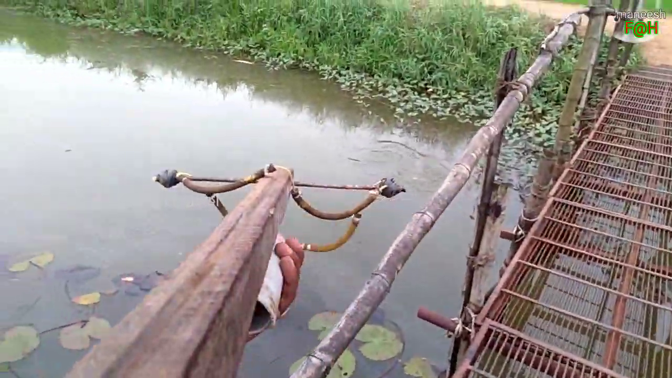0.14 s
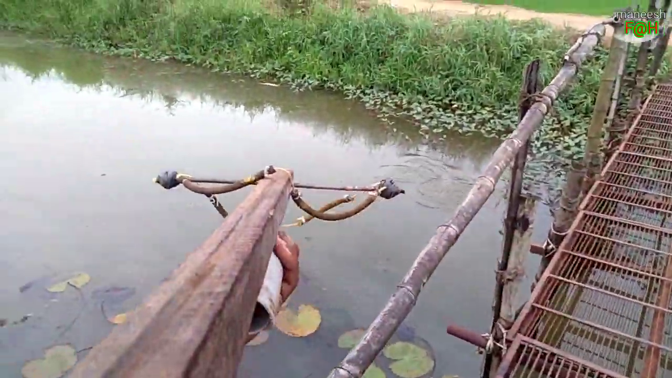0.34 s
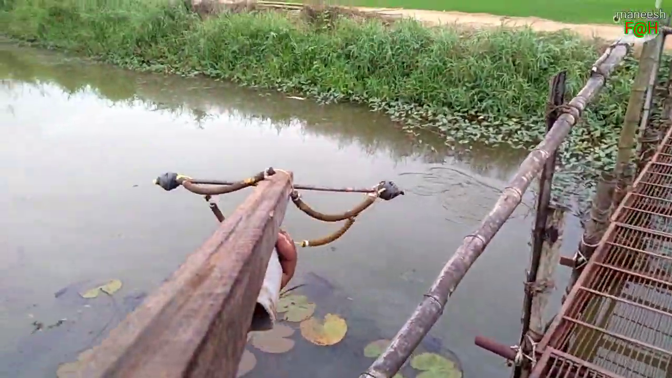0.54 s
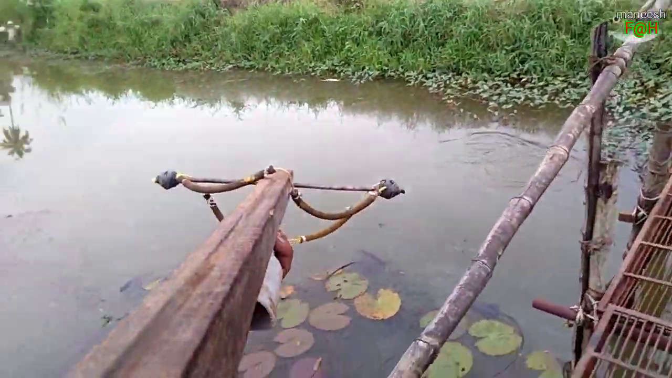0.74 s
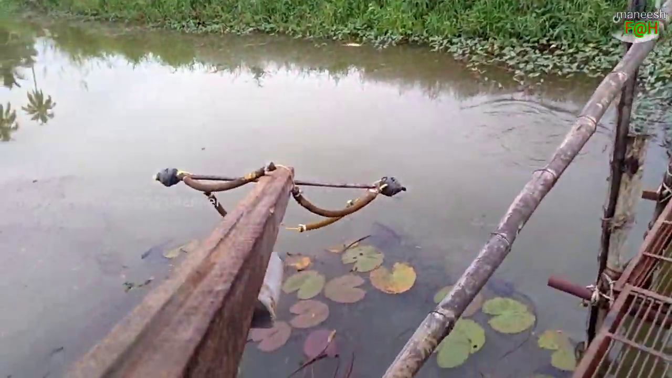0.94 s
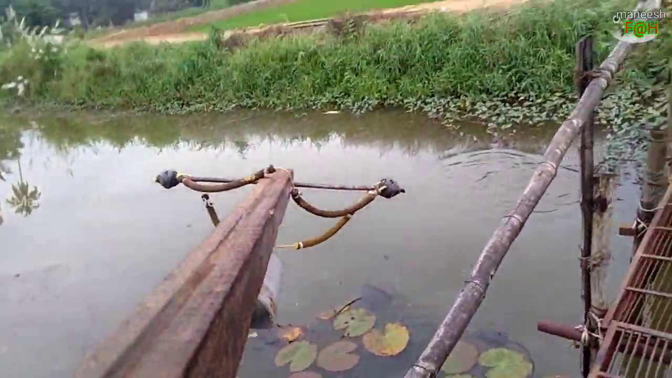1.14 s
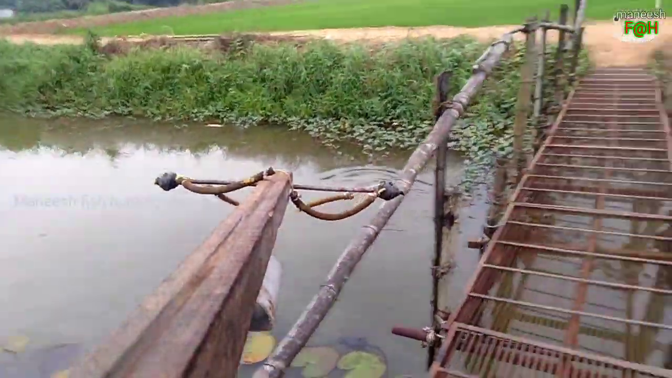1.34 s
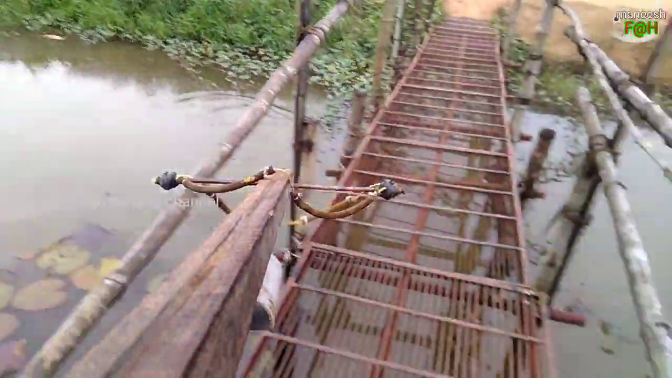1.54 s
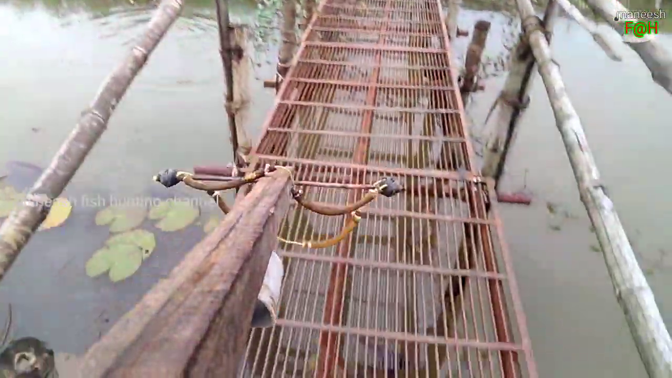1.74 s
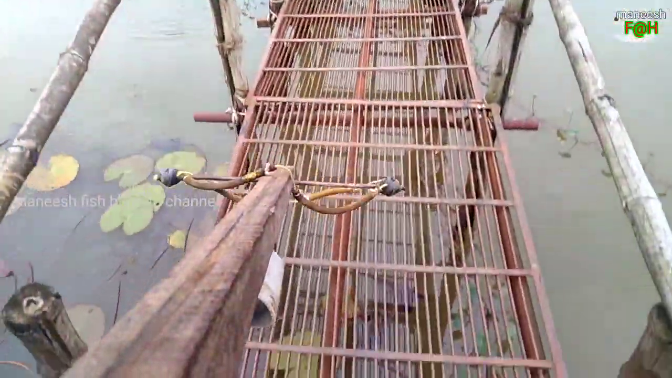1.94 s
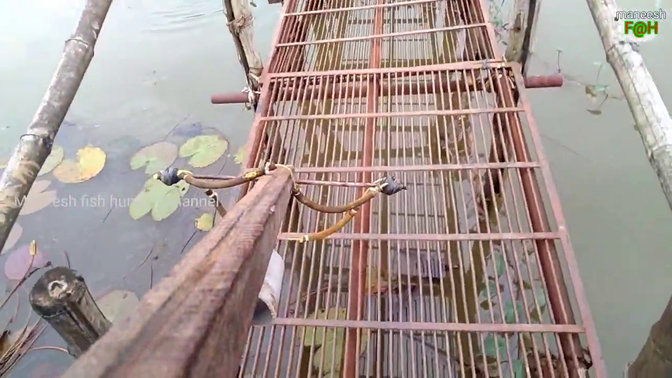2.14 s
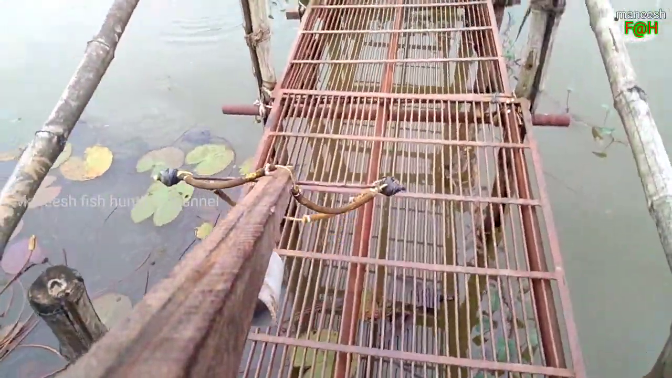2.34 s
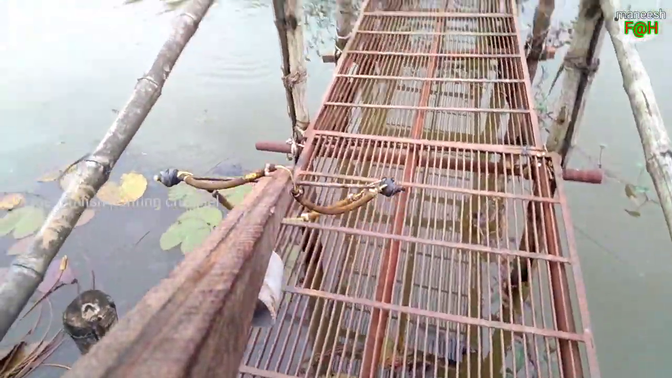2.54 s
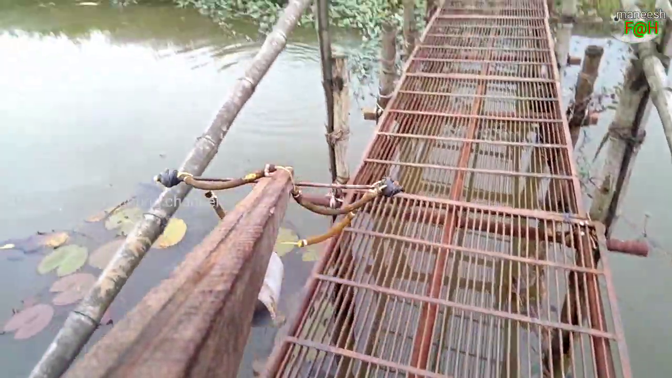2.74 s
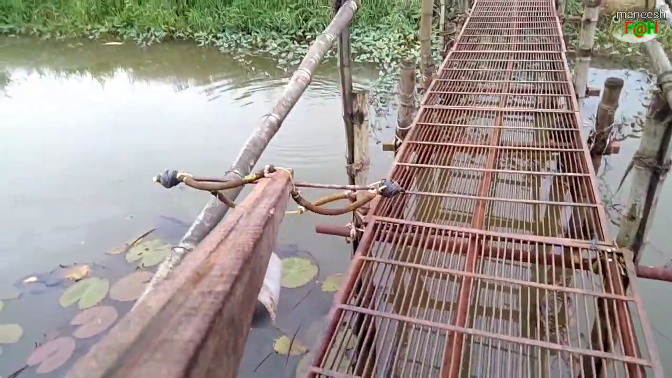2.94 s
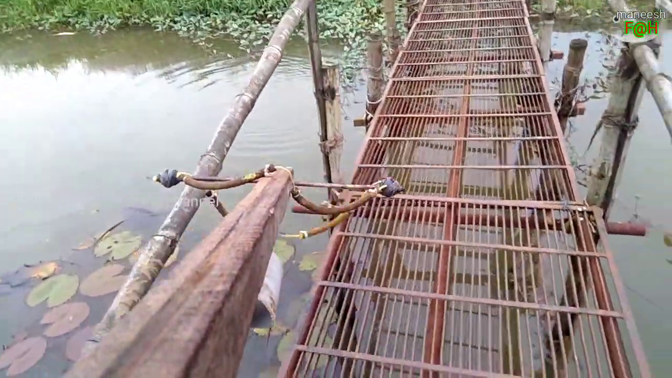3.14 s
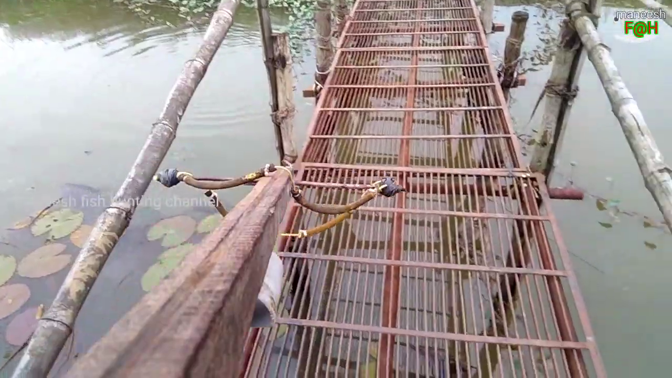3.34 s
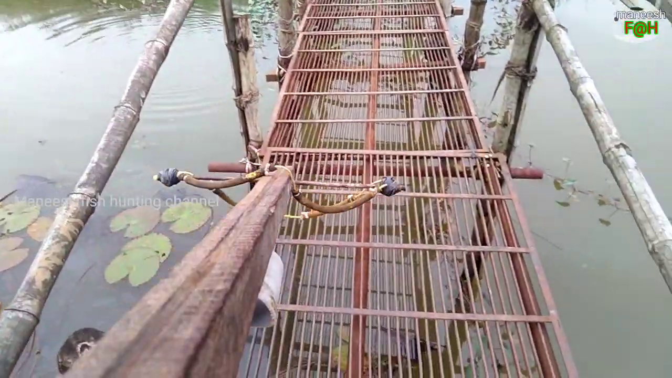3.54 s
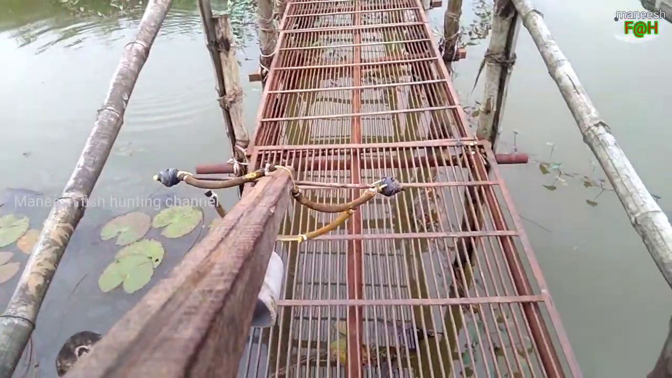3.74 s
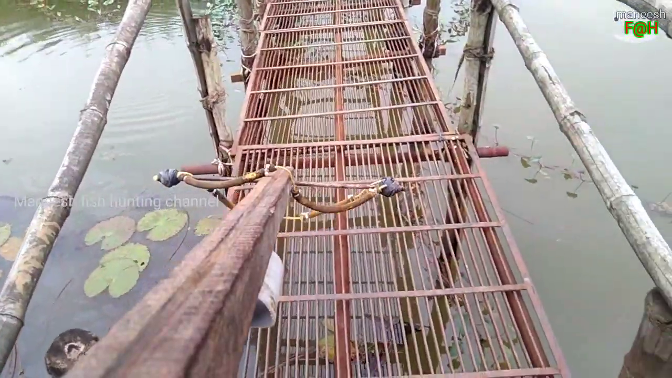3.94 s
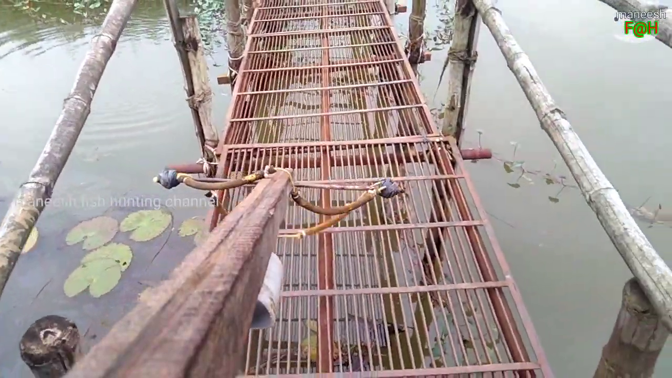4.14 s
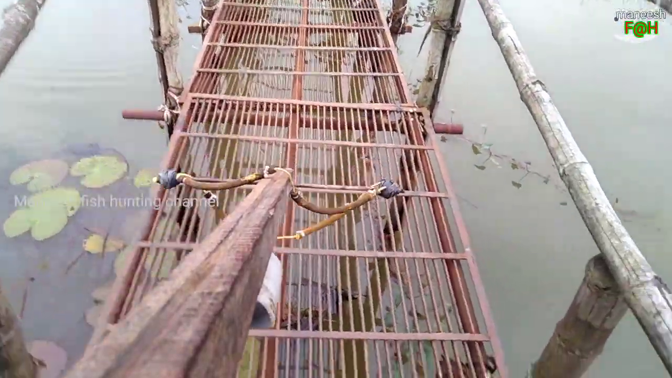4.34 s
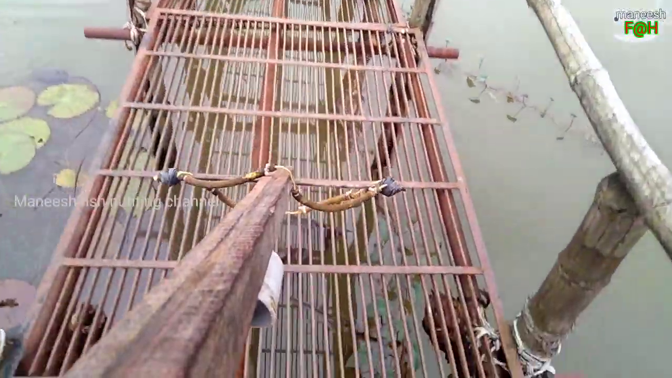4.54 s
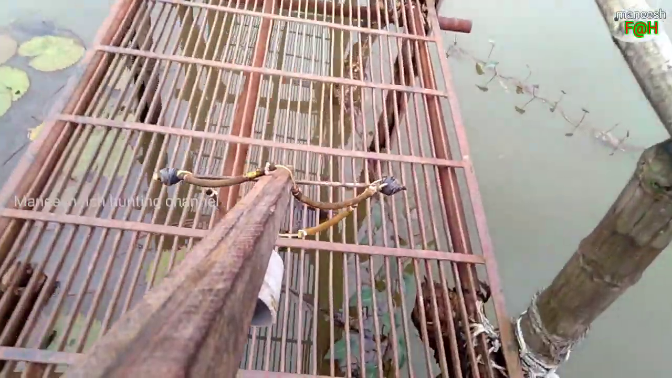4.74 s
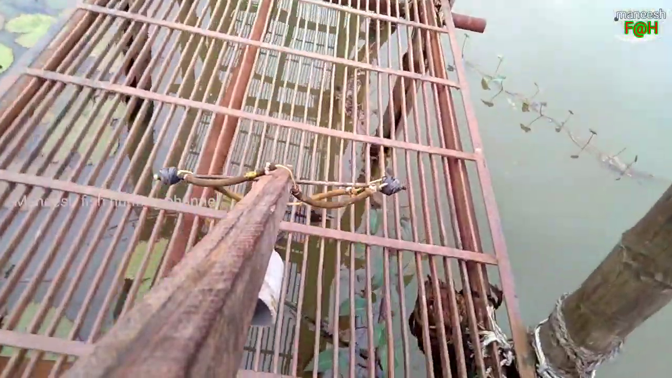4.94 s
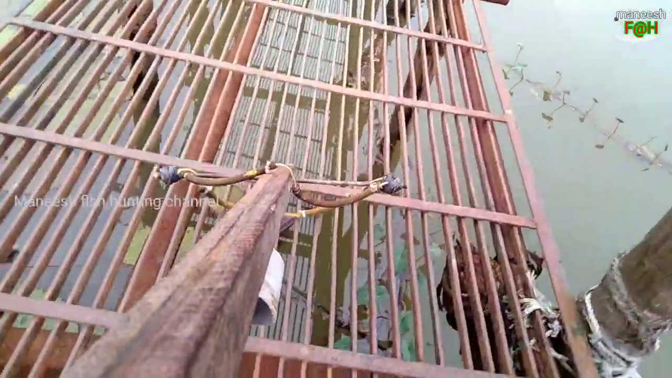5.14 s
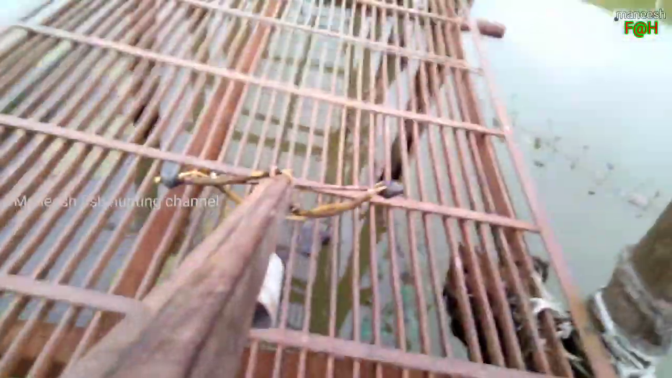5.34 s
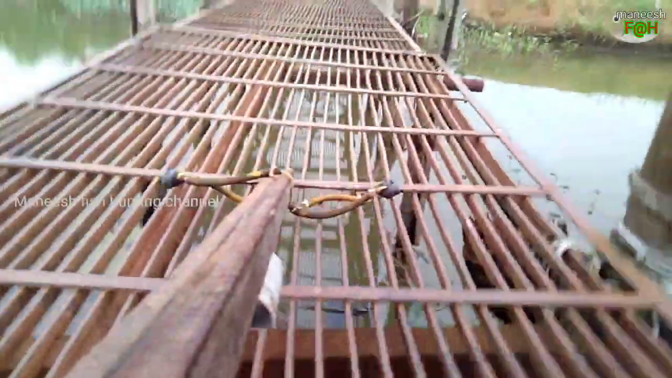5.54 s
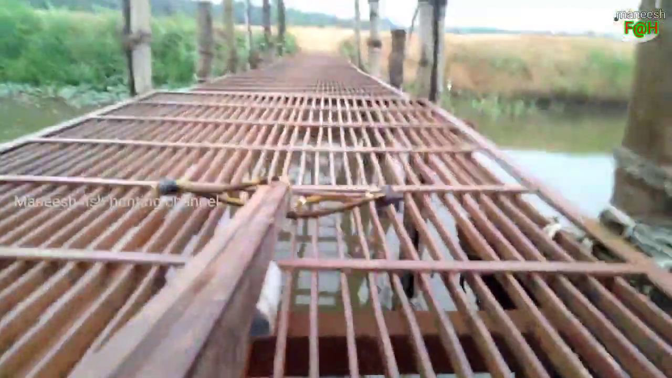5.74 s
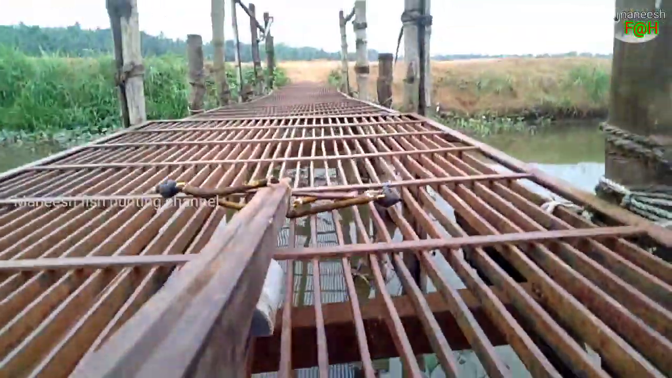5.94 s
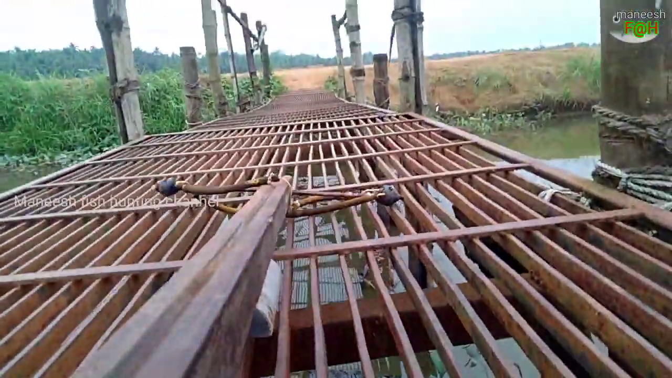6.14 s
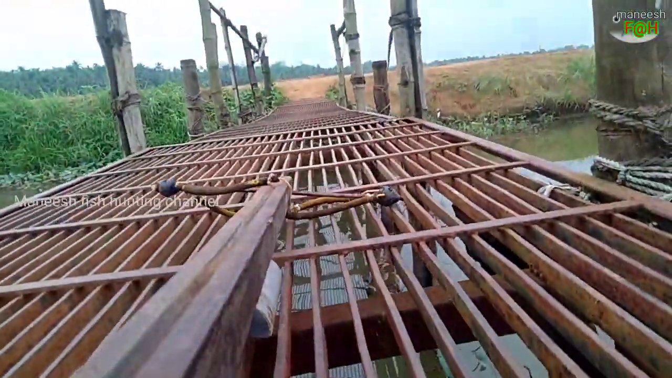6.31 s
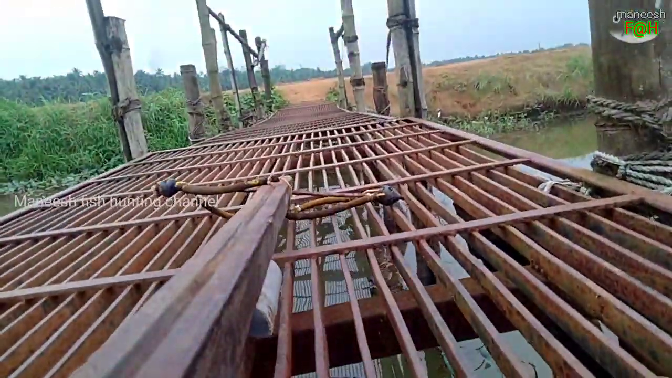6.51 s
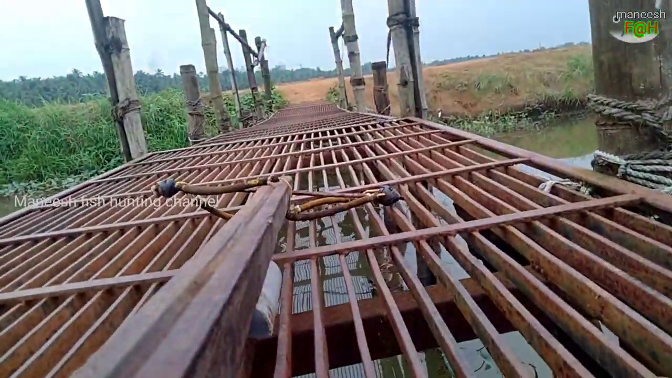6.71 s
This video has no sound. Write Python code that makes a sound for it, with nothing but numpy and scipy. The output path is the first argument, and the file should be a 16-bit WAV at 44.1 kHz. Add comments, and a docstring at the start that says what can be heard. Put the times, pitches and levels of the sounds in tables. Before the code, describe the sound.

A wooden fishing crossbow ticks in the hand, then knocks twice on a ringing steel grating, over faint outdoor insects and breeze.

```python
"""A steel footbridge over a pond, the microphone riding on the stock of a wooden fishing crossbow.
Insects shrill from the banks throughout, over a low breeze; now and then small birds call far off.
First a palm slides along the wood and stops with a tap, and the fittings tick as the bow is handled.
After five seconds the bow knocks on the grating, drags, and drops with a second knock that sets wood
and steel ringing again. At the very end it catches on the bars and slips with a short rasp."""
import sys
import numpy as np
from scipy import signal
from scipy.fft import rfft, irfft
from scipy.io import wavfile

SR = 44100
rng = np.random.default_rng(int(sys.argv[2]) if len(sys.argv) > 2 else 0)


def digitize_waveform(pressure):
    """Quantize a signal to 16-bit integers and store it at the path in sys.argv[1].

    Rows of a 2-D input are taken as channels; values are limited to [-1, 1].
    """
    field = np.atleast_2d(pressure).T
    bounded = np.clip(field, -1, 1)
    quanta = np.round(bounded * 32767).astype(np.int16)
    wavfile.write(sys.argv[1], SR, quanta)


N = 302965
T = np.arange(N) / SR


def knocks():
    """The bow hits the grating: the contact cracks, the stock rings under the microphone, the bars ring on."""
    # Each row: start in seconds, then levels in dB of crack, wood ring, low thump and steel ring.
    blows = [(5.2463, -19.5, -27.5, -24.5, -52), (5.370, -61, -68, -38, -64.5),
             (5.7115, -14, -29.5, -28.5, -43), (5.730, -35, -34, -41, -52), (6.033, -56, -78, -48.5, -71.5)]
    # Modes of the stock, its slow bending and the grating. Each row: pitch in Hz, level in dB, t60 in s.
    wood_modes = [(294, -12, .04), (398, 0.5, .035), (552, -9.5, 0.092), (623, -11.5, 0.031),
                  (750, -8, 0.05), (916, -10.5, 0.057), (1094, -19, 0.059), (1362, -1.5, 0.03),
                  (1546, -15, 0.044), (2060, -3, 0.018), (2190, -28, 0.028), (3080, -9, 0.013),
                  (3300, -11, 0.01), (3870, -19, 0.019), (5450, -20, 0.009)]
    bending_modes = [(127.7, -14, 0.38), (150, -5, 0.13), (173.8, -5, .11)]
    steel_modes = [(179, -5, 0.63), (318, -7, 0.8), (351.6, -5, 1.15), (403, -13, 0.93), (454, -6, 0.7),
                   (606, -15.5, 1), (662, -5, 0.78), (694, -14.5, 1.1), (754, -14, 1.1), (925, 9, 0.085),
                   (980, -12, 0.92), (1010, -9.5, 1.25), (1046, -14, 1.3), (1116, -14, 0.7),
                   (1290, -22, 0.63), (1600, -16, 0.08), (1980, -7, .06), (2234, -28, 0.55),
                   (2790, -23, 0.55), (2995, -25.5, 0.83)]
    # Spectra of the contact and of the whole bridge. Each row: frequency in Hz, relative level in dB.
    crack_spectrum = [(200, -12), (700, 5), (1500, -3.5), (3300, -5), (5100, -9.5), (6200, -10), (8000, -4),
                      (9400, 4.5), (11500, -9.5), (15000, -7.5), (16000, -13)]
    bridge_spectrum = [(120, -13.5), (330, 6.5), (520, -2.5), (750, 2), (880, -7.5), (1030, 0), (1250, -11),
                       (1600, -14.5), (3000, -20), (4500, -31.5), (7000, -30), (9300, -16.5), (15000, -43)]
    touch_s, rebound_s = .002, .006  # a light touch leads each blow and a rebound follows
    crack, body, crunch, wash = np.zeros((4, N))
    for s, crack_db, wood_db, thump_db, steel_db in blows:
        for lag, db in [(-touch_s, -13), (0, 0), (rebound_s, -15.5)]:
            add(crack, s + lag, undb(crack_db + db) * burst(t60=0.0072))
        add(body, s, undb(wood_db) * ring(wood_modes, scatter_db=1.8, detune=0.011))
        add(crunch, s, undb(wood_db - 13.5) * burst(t60=0.07))
        # the whole stock bends more slowly than the contact cracks
        thump = undb(thump_db) * ring(bending_modes, scatter_db=2.5, detune=.005)
        add(body, s + 0.0035, thump)
        add(body, s + 0.0036 + rebound_s, undb(-3) * thump)
        add(body, s, undb(steel_db) * ring(steel_modes, scatter_db=0.1, detune=0.00062))
        # a neighbouring bar, not quite alike, beats against the struck one
        add(body, s, undb(steel_db - 11.5) * ring(steel_modes, scatter_db=2.0, detune=0.0053))
        # the rest of the bridge answers with a dense wash of modes
        add(wash, s, undb(steel_db) * burst(t60=0.81))
    crunch = colour(crunch, [(300, -10), (1500, 1), (2600, -5), (6000, -20.5)])
    bridge = undb(-2) * colour(wash, bridge_spectrum)
    rattle = undb(-15) * resonate_twice(wash, hz=2700, width=1400)
    return colour(crack, crack_spectrum) + body + crunch + bridge + rattle


def ticks():
    """Fittings close to the microphone snap and chatter, with a short bright ring and a duller body."""
    # Each row: start in seconds, level in dB, relative level of the dull body in dB.
    snaps = [(0.3426, -38.5, -16), (0.5889, -23, -13.5), (0.679, -34, -10), (0.7608, -29, -11),
             (0.8278, -34.5, -2), (1.3481, -31, -10.5), (1.608, -47, -4), (2.5761, -43, -19),
             (2.761, -43, -20), (4.4885, -38, -21), (4.9143, -46, 2), (5.298, -28, -11),
             (5.5432, -35, -9.5), (5.6538, -14, -22.5), (5.675, -19, -16), (5.7215, -23, -22),
             (5.7473, -24.5, -19), (5.7651, -30.5, -13), (5.896, -40.5, -3), (6.0341, -29.5, -23),
             (6.2807, -38.5, -18), (6.4053, -37.5, -19), (6.579, -43.5, -15)]
    out = np.zeros(N)
    for s, db, body_db in snaps:
        push = 0.12 * burst(t60=.011)  # the chatter
        push[0] = 1  # the snap
        push = np.pad(push, (0, 512))
        bright = resonate(resonate(push, 8500, 2600), 9300, 7500)
        top = undb(-11.5) * resonate(push, 13800, 2600)
        body = resonate(push, 3900, 4200) + 0.46 * resonate(push, 2000, 1200)
        tick = 0.14 * push + bright + top + undb(body_db + 5.5) * body
        add(out, s + .0009, undb(db - 0.7) * tick / np.abs(tick).max())
    return out


def hand():
    """The palm hisses along the hollow grip in strokes that set it ringing, and stops with a tap."""
    # Each row: start and end of a stroke in seconds, first and last level in dB.
    strokes = [(-0.01, 0.044, -60.5, -62.5), (0.444, 0.687, -56.5, -53.5), (0.866, 0.961, -59.5, -45)]
    # Modes of the grip. Each row: pitch in Hz, level in dB, t60 in seconds.
    grip_modes = [(180, -1, 0.13), (250, -4.5, .07), (329, 1.5, .085), (815, -15.5, 0.15), (895, -17, 0.12),
                  (1980, -6.5, 0.037), (2200, -13, 0.037), (2980, -5, 0.026)]
    # Skin rubbing on wood. Each row: frequency in Hz, relative level in dB.
    palm_spectrum = [(100, 1), (200, 4), (350, 3.5), (600, -11), (850, -6), (1150, -16), (1900, -9),
                     (4200, -12.5), (7000, -9), (8200, -5.5), (9300, 5), (11500, -7), (15500, -11.5)]
    speed = np.zeros(N)
    for start, end, first_db, last_db in strokes:
        speed += gate(start, end + 0.0058, edge=0.0082) * curve([(start, first_db), (end, last_db)])
    speed *= undb(0.83 * walk(89.4))
    grip = ring(grip_modes, scatter_db=1.5, detune=0.0037)
    out = colour(friction(grain_db=5.0), palm_spectrum) * speed
    out += undb(-7.5) * excite(friction(grain_db=1) * speed, grip)
    tap_s = 0.96
    tap_spectrum = [(900, -9.5), (2400, 0), (5500, -12), (9400, 3.5), (12000, -6), (15500, -4)]
    snap = np.pad(burst(t60=.016), (0, 1024))
    add(out, tap_s, undb(-29.5) * colour(snap, tap_spectrum))
    add(out, tap_s + 0.00102, undb(-40) * grip)
    # the fingers settle with a short rustle
    add(out, tap_s, undb(-49) * resonate_twice(burst(t60=0.19), hz=1500, width=2600))
    return out


def bumps():
    """Soft contacts rock the bow in the hand for a cycle or two."""
    # Each row: start in seconds, level in dB.
    contacts = [(3.928, -46), (4.492, -43), (4.566, -41.5), (5.539, -30), (5.586, -34), (5.602, -33.5),
                (5.646, -31), (5.694, -30.5), (5.746, -33.5), (6.021, -43), (6.066, -43.5)]
    rock_hz, rise_s = 61, 0.0061
    out = np.zeros(N)
    t = T[:SR // 4]
    swell = t / rise_s * np.exp(1 - t / rise_s)
    for s, db in contacts:
        hz = rock_hz * np.exp(.12 * rng.normal())
        add(out, s, -undb(db) * swell * np.sin(2 * np.pi * hz * t))
    return out


def drag():
    """Between its two landings the wood drags over the steel bars, rumbling, groaning and gritting."""
    rumble = undb(-49.5) * band(noise(), hz=91, width=125)
    groan = undb(-60) * band(friction(grain_db=3.5), hz=339, width=80)
    grit = undb(-74.5) * band(friction(grain_db=5), hz=1600, width=1800)
    pressure = undb(1.8 * walk(30))
    return (rumble + groan + grit) * gate(5.25, 5.82, edge=0.049) * pressure


def scuffs():
    """Fingers, cloth and wood rub briefly; each rub swells fast and is pitched by the surface it touches."""
    # Each row: start and length in seconds, centre in Hz, level in dB.
    rubs = [(0.673, 0.068, 169, -52), (0.715, 0.026, 513, -58.5), (2.585, 0.073, 2840, -76),
            (2.753, 0.076, 5030, -77), (4.565, .5, 1760, -80), (5.361, 0.055, 340, -50),
            (5.487, .07, 340, -57), (5.579, 0.037, 1700, -61)]
    out = np.zeros(N)
    for s, length, hz, db in rubs:
        progress = np.linspace(0, 1, int(length * SR))
        swell = np.sin(np.pi * progress ** 0.66) ** 2
        rub = band(friction(grain_db=5.0), hz, width=0.61 * hz)[-len(progress):]
        add(out, s, undb(db) * swell * rub)
    return out


def scrape():
    """The resting bow catches a few times on the bars and slips with a rasp."""
    # Wood slipping on steel. Each row: frequency in Hz, relative level in dB.
    rasp_spectrum = [(300, 1), (1000, -15), (1400, -3), (1900, -23.5), (2650, 0.5), (3400, -5.5),
                     (4300, -21), (5600, -14.5), (7700, -17), (9200, -1.5), (10500, -20), (15500, -24)]
    catches = np.zeros(N)
    for s, db in [(6.7835, -21.5), (6.788, -31), (6.794, -26), (6.8012, -17), (6.8043, -18.5)]:
        add(catches, s, undb([db]))
    clunks = undb(2.5) * resonate(resonate(catches, 660, 520), 570, 970)
    rasp = colour(friction(grain_db=0.5), rasp_spectrum) * undb(0.65 * walk(160))
    slip = gate(6.783, 7, edge=0.0029) * curve([(6.783, -61.5), (6.82, -55.5), (6.87, -58.5)])
    return clunks + rasp * slip


def insects():
    """Wings on the banks blur into throbbing bands; most fade as the microphone is lowered to the deck."""
    # Each row: centre and width in Hz, relative level in dB, change at deck height in dB.
    voices = [(6560, 390, -11.5, -5), (7785, 630, 0, -2.5), (9210, 800, 1, 2.5), (9860, 710, -2, -5)]
    # The course of the whole chorus. Each row: time in seconds, level in dB.
    chorus_level = [(0.0, -63), (0.84, -64.5), (1.93, -70), (4.21, -69), (5.26, -73.5), (5.45, -69),
                    (5.78, -68.5), (6.31, -77.5), (6.87, -79.5)]
    lowered = np.interp(T, [4.2, 5.8], [0, 1])
    out = np.zeros(N)
    for hz, width, db, lowered_db in voices:
        throb = 1 + 0.092 * tone(9.9 + 0.79 * walk(1.2))
        flicker_db = (1.0 + 1.2 * lowered) * walk(25)
        out += undb(db + lowered_db * lowered + flicker_db) * throb * band(noise(), hz, width)
    return out * curve(chorus_level) * undb(-4.5)


def birds():
    """Far off, upswept whistles, triple chips, lone peeps and a rough twitter, blurred by the banks."""
    # One bird whistles, another chips. Each row: start in seconds, level in dB.
    whistles = [(1.125, -85), (1.605, -82), (3.152, -82), (4.452, -79), (4.890, -80)]
    chips = [(1.670, -82), (2.325, -85), (3.310, -84), (4.240, -81)]
    # Nearly level notes. Each row: start and length in seconds, pitch in Hz, level in dB.
    peeps = [(2.406, .12, 1950, -81), (6.330, 0.013, 2970, -70.5), (6.61, .08, 3590, -82)]
    out = np.zeros(N)
    for s, db in whistles:
        add(out, s, undb(db) * bird_note(length=.087, first_hz=3080, last_hz=4630))
    for s, db in chips:
        for k in range(3):
            add(out, s + k * .032, undb(db) * bird_note(length=0.013, first_hz=6100, last_hz=5300))
    for s, length, hz, db in peeps:
        add(out, s, undb(db) * bird_note(length, hz, 1.025 * hz))
    syllables = np.maximum(np.sin(2 * np.pi * 4.6 * (T - 2.38)) + 0.43, 0) * gate(2.38, 4.9, edge=0.023)
    flutter = undb(2.5 * walk(70))
    twitter = flutter * syllables * tone(2950 + 220 * walk(260))
    out += undb(-87.5) * twitter
    echo = excite(out, burst(t60=0.73))
    return out + undb(-7.5) * echo


def bird_note(length, first_hz, last_hz):
    """One gliding note; leaves scatter it into a hoarse flutter."""
    size = int(length * SR)
    progress = np.linspace(0, 1, size)
    glide_hz = first_hz + (last_hz - first_hz) * progress ** 1.15
    waver = 1 + .014 * walk(450)[:size]
    flutter = undb(3.6 * walk(150)[:size])
    return flutter * np.sin(np.pi * progress) * tone(glide_hz * waver)


def air():
    """Open air over the pond: a rumble that swells with the breeze, and a thin hiss that comes and goes."""
    # Each row: frequency in Hz, relative level in dB.
    rumble_spectrum = [(12, -24), (20, 0), (47, -3), (69, -8), (108, -4.5), (143, -9.5), (241, -17),
                       (397, -30), (736, -28), (956, -33), (1210, -33.5), (2140, -38.5), (5800, -50.5),
                       (7540, -77.5), (12800, -120)]
    hiss_spectrum = [(1000, -4.5), (3000, -7), (5500, -10.5), (9300, 0), (11800, -4), (13000, 0),
                     (15300, 1.5), (15900, -10)]
    # Each row: time in seconds, relative level in dB.
    breeze_level = [(0, 4), (1.1, 4), (1.6, 0), (4.3, 1), (4.65, 4.5), (5.1, 1), (6.2, 4.5), (6.87, 0)]
    hiss_level = [(0.0, -75), (0.46, -81), (0.65, -75), (1.07, -77.5), (1.34, -88), (1.78, -88), (2.2, -84),
                  (3.25, -92.5), (5.09, -86), (5.47, -79.5), (6.75, -84), (6.87, -84)]
    rumble = colour(noise(), rumble_spectrum) * undb(-61.5 + 1.33 * walk(11)) * curve(breeze_level)
    hiss = colour(friction(grain_db=4.5), hiss_spectrum) * curve(hiss_level) * undb(4.2 + 1.2 * walk(34))
    return rumble + hiss + undb(-88) * noise()


def undb(db):
    """Decibels to gain."""
    return 10 ** (np.asarray(db) / 20)


def unit(x):
    """Scale to rms 1."""
    return x / np.sqrt(np.mean(x ** 2))


def noise(size=N):
    """White noise."""
    return rng.standard_normal(size)


def tone(hz):
    """A sine that follows a changing frequency."""
    return np.sin(2 * np.pi * np.cumsum(hz) / SR)


def curve(rows):
    """Gain along rows of time in seconds and level in dB."""
    return undb(np.interp(T, *np.transpose(rows)))


def walk(rate):
    """Random drift with spread near 1, turning `rate` times a second."""
    return 1.1 * np.interp(T * rate, np.arange(4096), noise(size=4096))


def colour(x, spectrum):
    """Minimum-phase filter of unit power gain, shaped by rows of frequency in Hz and level in dB."""
    hz, db = np.transpose(spectrum)
    gain = undb(np.interp(np.log(np.fft.rfftfreq(8192, 1 / SR) + 1), np.log(hz), db))
    cepstrum = irfft(np.log(unit(gain)))
    half = len(cepstrum) // 2
    cepstrum[1:half] *= 2
    cepstrum[half + 1:] = 0
    return signal.fftconvolve(x, irfft(np.exp(rfft(cepstrum))))[:len(x)]


def resonate(x, hz, width):
    """One resonance, `width` Hz wide, gain 1 at its centre."""
    return signal.lfilter(*signal.iirpeak(hz, hz / width, fs=SR), x)


def resonate_twice(x, hz, width):
    """The same resonance twice, for steeper sides."""
    return resonate(resonate(x, hz, width), hz, width)


def band(x, hz, width):
    """A steep-sided band of x, scaled to rms 1."""
    return unit(resonate_twice(x, hz, width))


def excite(x, response):
    """Pass x through an impulse response scaled to unit energy."""
    return signal.fftconvolve(x, response / np.linalg.norm(response))[:N]


def fade(t60):
    """Exponential decay that ends 60 dB down after t60 seconds."""
    return np.exp(-np.log(1000) * T[:int(t60 * SR) + 2] / t60)


def add(out, s, x):
    """Mix x into out from s seconds on."""
    i = int(s * SR)
    out[i:i + len(x)] += x[:max(N - i, 0)]


def ring(modes, scatter_db, detune):
    """Struck modes; each blow lands elsewhere and weights them a little differently."""
    out = np.zeros(2 * SR)
    for hz, db, t60 in modes:
        decay = fade(t60)
        gain = undb(db + scatter_db * rng.normal())
        pitch = hz * (1 + detune * rng.normal())
        add(out, 0, gain * decay * np.sin(2 * np.pi * pitch * T[:len(decay)]))
    return out


def burst(t60):
    """Decaying noise: countless close modes."""
    decay = fade(t60)
    return noise(size=2 * SR)[:len(decay)] * decay


def gate(start, end, edge):
    """Opens and closes with ramps of `edge` seconds."""
    return np.clip((T - start) / edge, 0, 1) * np.clip((end - T) / edge, 0, 1)


def friction(grain_db):
    """Dense micro-slips of uneven size."""
    return unit(noise() * undb(grain_db * noise()))


def scene():
    """The bow close up and the pond around it, in mono from the stock."""
    bow = knocks() + ticks() + bumps() + hand() + drag() + scuffs() + scrape()
    return (bow + insects() + birds() + air())[None]


def record(dry):
    """The recorder cuts the top above 16 kHz."""
    return signal.sosfilt(signal.ellip(8, .2, 70, 16000, fs=SR, output="sos"), dry)


dry = scene()
out = record(dry)
digitize_waveform(out)
```